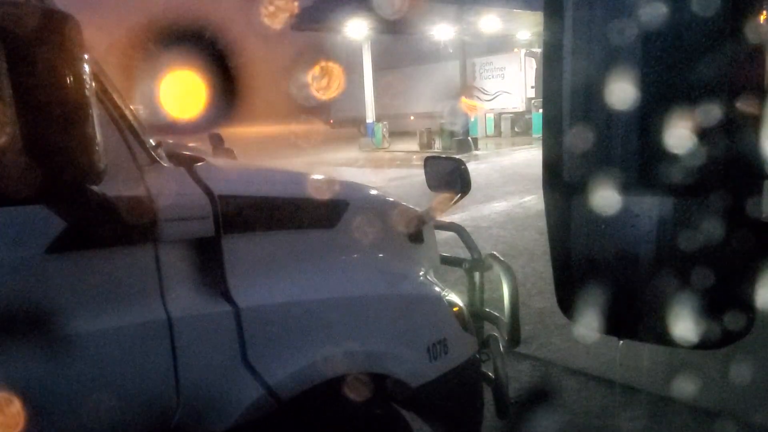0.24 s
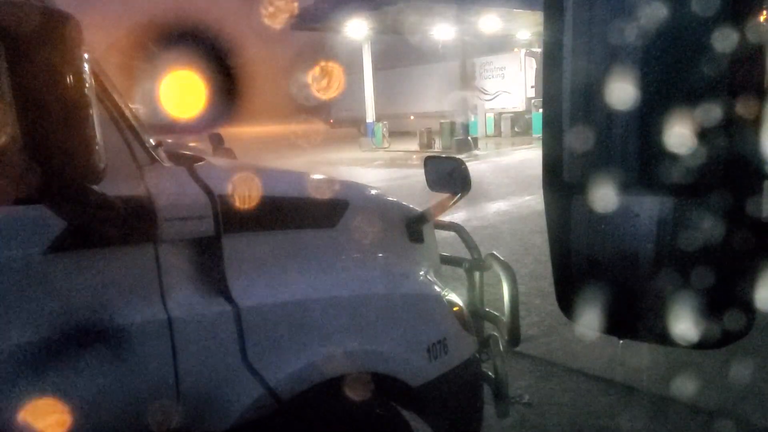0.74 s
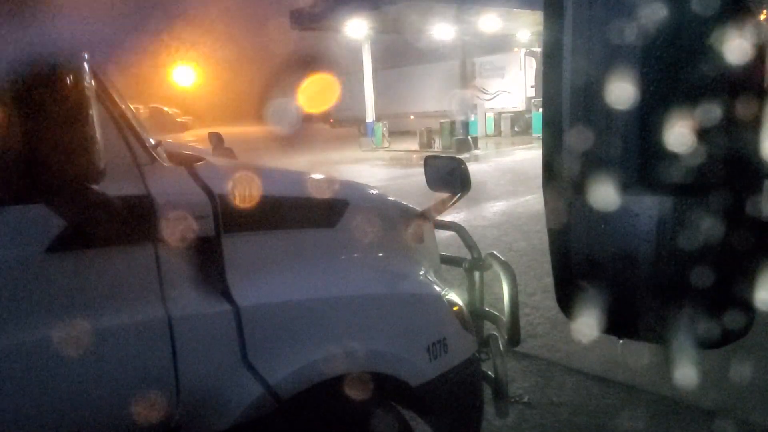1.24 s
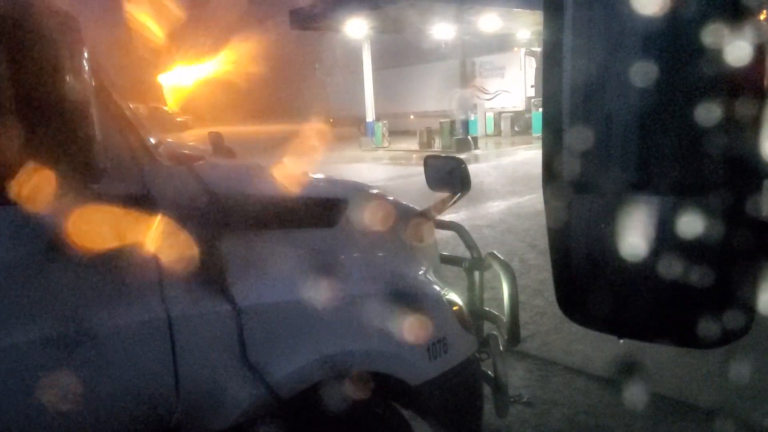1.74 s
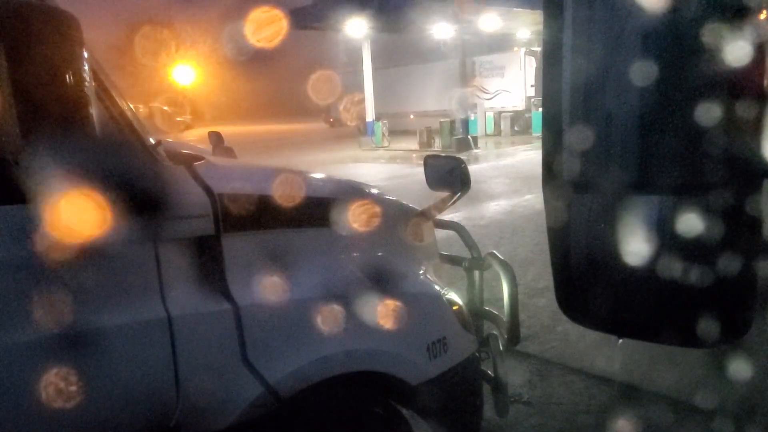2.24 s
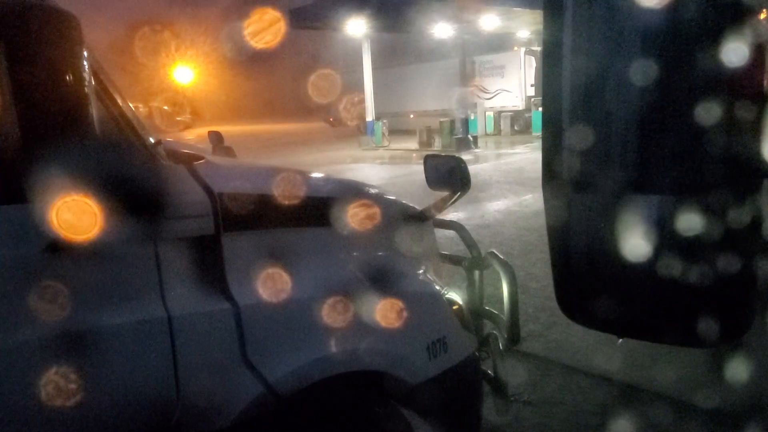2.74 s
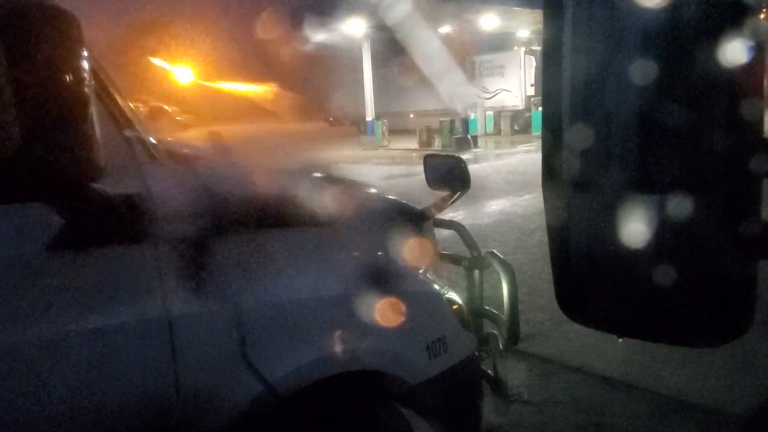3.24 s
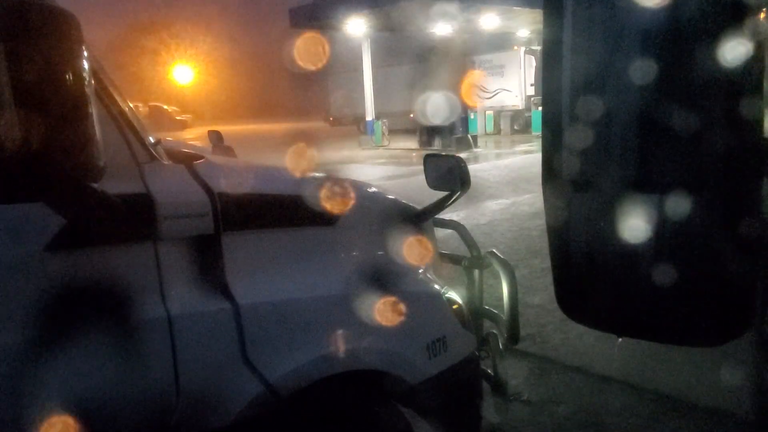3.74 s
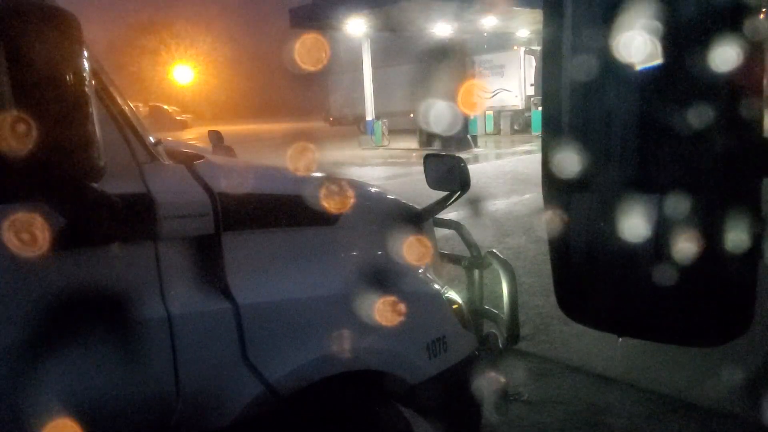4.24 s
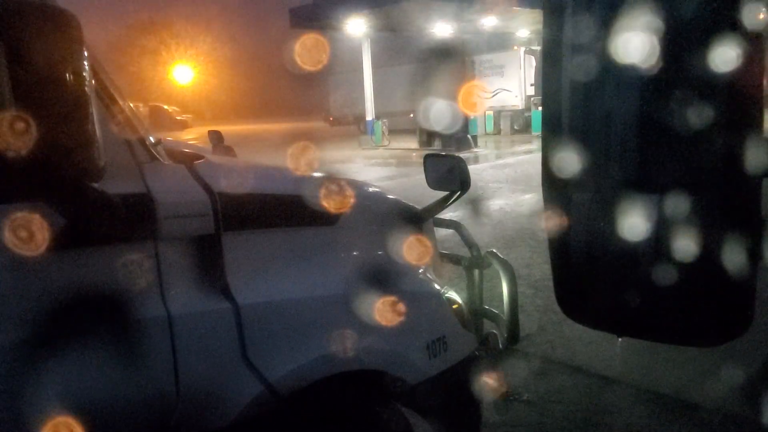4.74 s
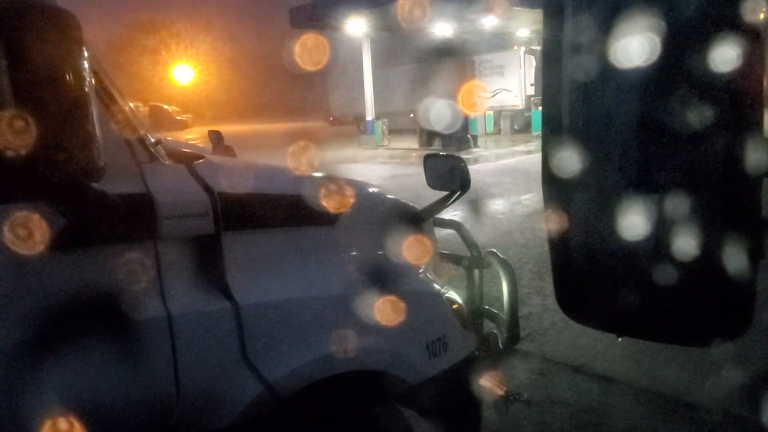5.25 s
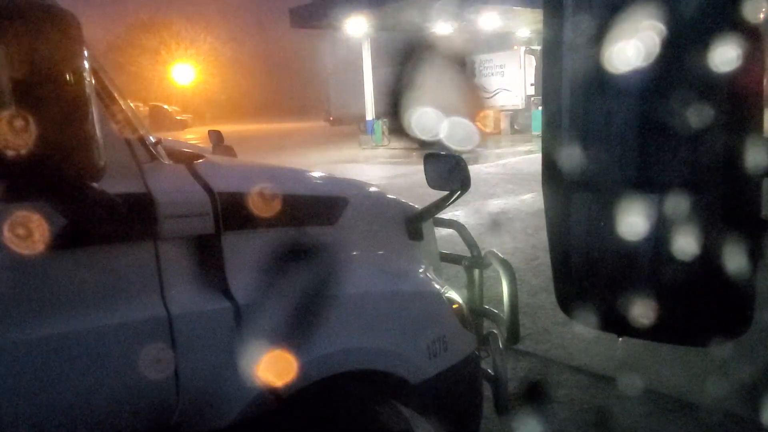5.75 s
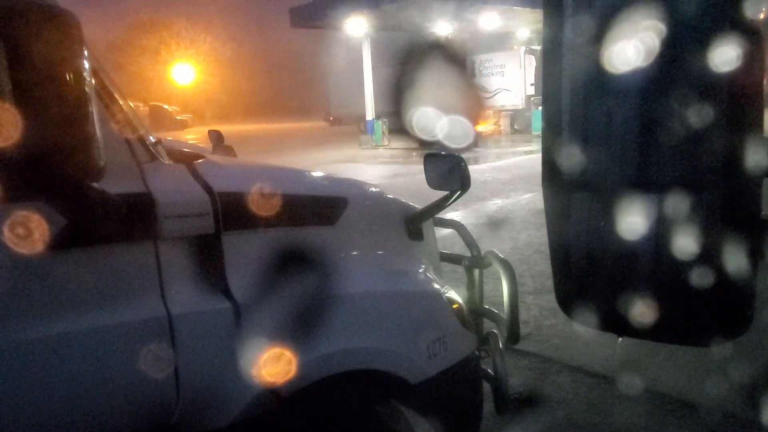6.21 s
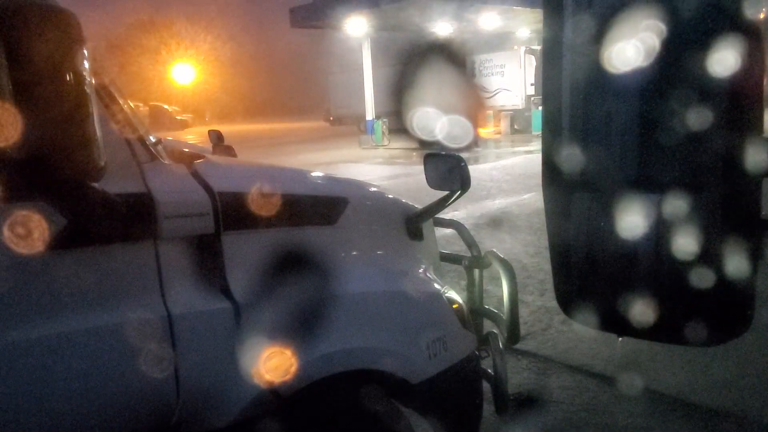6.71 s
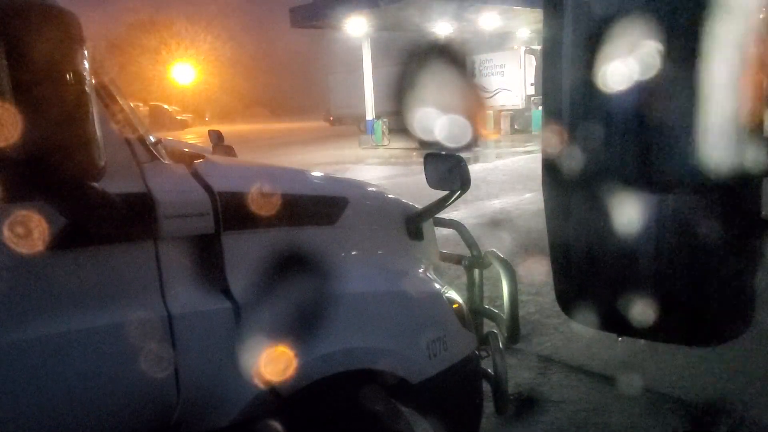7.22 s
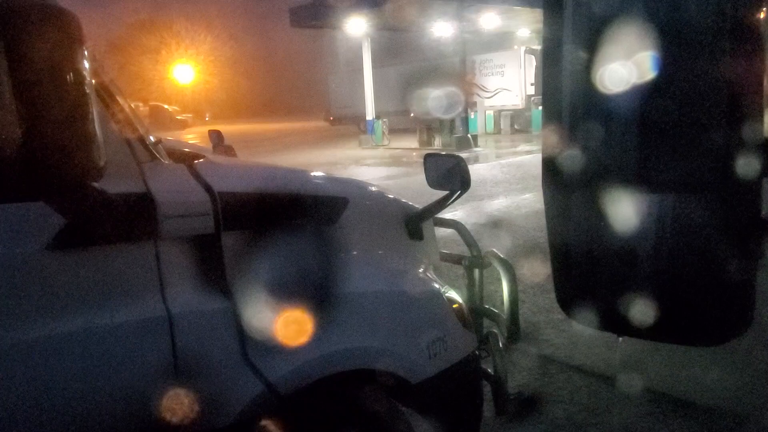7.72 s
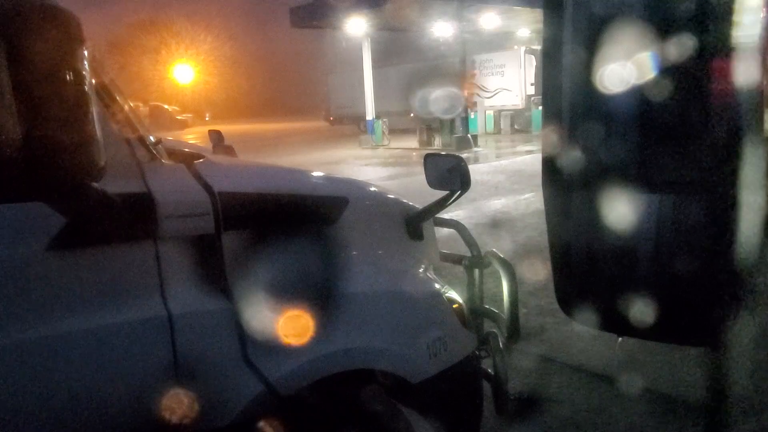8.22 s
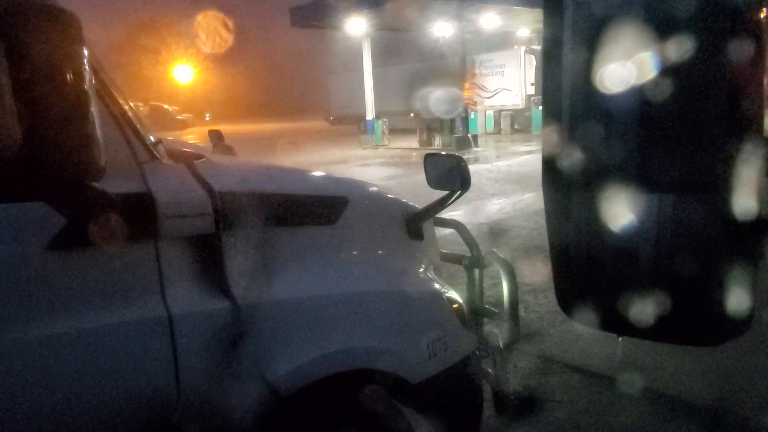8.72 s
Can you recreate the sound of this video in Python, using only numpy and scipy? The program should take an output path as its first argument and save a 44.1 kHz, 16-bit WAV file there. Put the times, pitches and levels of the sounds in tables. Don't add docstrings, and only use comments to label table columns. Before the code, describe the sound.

From inside a parked truck cab, low beating diesel idle, steady rain patter, sharp ringing drops on the pane and faint far thunder.

```python
import sys
import numpy as np
from scipy import signal
from scipy.fft import rfft, irfft, next_fast_len
from scipy.io import wavfile
from scipy.ndimage import map_coordinates

SR = 44100
rng = np.random.default_rng(int(sys.argv[2]) if len(sys.argv) > 2 else 0)


def persist_wave(psi):
    counts = np.round(np.clip(psi, -1, 1) * 32767).astype(np.int16)
    wavfile.write(sys.argv[1], SR, np.atleast_2d(counts).T)


def rack_gain(trim_db):
    fader = np.asarray(trim_db, float)
    return 10 ** (fader / 20)


N = 395577


def unit(x):
    return x / np.sqrt(np.mean(x ** 2) + 1e-20)


def along(points, hz):
    f, value = np.transpose(points)
    return np.interp(np.log(hz + 1), np.log(f + 1), value)


def curves(rows):
    s, *columns = np.transpose(rows)
    t = np.arange(N) / SR
    return [np.interp(t, s, column) for column in columns]


def wobble(rate):
    knots = rng.standard_normal(int(N * rate / SR) + 4)
    return map_coordinates(knots, [np.arange(N) * rate / SR])


def filtered(x, response):
    m = next_fast_len(N + 8192)
    return irfft(rfft(x, m) * response(np.fft.rfftfreq(m, 1 / SR)), m)[..., :N]


def coloured(x, spectrum):
    gain = rack_gain(along(spectrum, np.linspace(0, SR / 2, 20000)))
    rms_gain = np.sqrt(np.mean(gain ** 2))
    return filtered(x, lambda hz: rack_gain(along(spectrum, hz)) / rms_gain)


PORT_LAG, CAB_HZ = .00041, 890
# (frequency [Hz], shared power [0-1])
LIKENESS = [(200, 0.97), (350, .8), (500, 0.65), (800, 0.71), (950, .28), (1500, .35), (4000, 0.22),
            (6000, 0.066)]


def ports():
    def share(hz):
        return np.clip(along(LIKENESS, hz), 0, 1)

    def shared_path(hz):
        half_lag = np.pi * hz * PORT_LAG / (1 + (CAB_HZ / (hz + 1)) ** 20)
        return np.sqrt(share(hz)) * np.exp([1j * half_lag, -1j * half_lag])

    shared = filtered(rng.standard_normal(N), shared_path)
    own = filtered(rng.standard_normal((2, N)), lambda hz: np.sqrt(1 - share(hz)))
    return shared + own


def bursts(s, db, pan_db, t60):
    start = np.clip(np.round(s * SR).astype(int), 0, N - 1)
    power = [np.bincount(start, rack_gain(2 * db + side * pan_db), N) for side in (1, -1)]
    t = np.arange(SR // 5) / SR
    decay = rack_gain(-120 * t / t60) * (1 - np.exp(-t / 0.00043))
    return np.sqrt(np.abs(signal.fftconvolve(power, decay[None], axes=1)[:, :N]))


# (time [s], deep roll level [dB], upper roll level [dB])
THUNDER_ROLLS = [(0.0, -42, -32.5), (0.32, -40, -35.5), (0.42, -41, -34.5), (0.82, -38, -30.5),
                 (0.87, -39, -36), (1.1, -39, -32.5), (1.2, -40, -32.5), (1.3, -45, -27.5),
                 (1.45, -36.5, -34), (1.65, -36, -34), (1.75, -42, -36), (1.82, -39, -29), (1.97, -41, -35),
                 (2.07, -39, -27.5), (2.55, -36, -34.5), (2.62, -41, -26.5), (2.82, -41, -36),
                 (2.87, -39, -32), (3.85, -43, -31), (4.1, -38, -29.5), (4.22, -44, -29.5),
                 (4.35, -43, -23.5), (4.42, -46, -31), (5.04, -38, -34), (5.12, -36, -31), (5.2, -46, -34),
                 (5.27, -39, -32), (5.35, -39, -30), (5.64, -37, -31.5), (5.72, -42, -29), (5.9, -36, -35),
                 (6.02, -43, -32), (6.12, -46, -29.5), (6.39, -43, -28), (6.49, -42, -32), (6.62, -50, -31),
                 (6.8, -35, -31.5), (7.07, -37, -33), (7.19, -48, -31), (7.27, -42, -40),
                 (7.34, -52, -30.5), (7.87, -41, -34.5), (7.92, -54, -32), (8.02, -35, -36.5),
                 (8.59, -36.5, -31), (8.74, -37, -33), (8.87, -35, -36), (8.97, -33, -36)]
# (frequency [Hz], level [dB per Hz])
DEEP_ROLL = [(15, -60), (25, -8), (35, -1.5), (47, 7.5), (60, 4), (85, 1.5), (120, -42.5)]
# (frequency [Hz], level [dB per Hz])
UPPER_ROLL = [(60, -37), (90, -0.5), (140, 2), (200, -1.5), (260, -10), (400, -47)]


def thunder():
    deep_db, upper_db = curves(THUNDER_ROLLS)
    deep = rack_gain(deep_db + 1.5 + 1.5 * wobble(7)) * coloured(ports(), DEEP_ROLL)
    upper = rack_gain(upper_db - 1.0 + 1.2 * wobble(9)) * coloured(ports(), UPPER_ROLL)
    return deep + upper


def shower(spectrum, grainy, rate, spread_db, t60):
    when, size, side = rng.random((int(rate * N / SR), 3)).T
    grains = unit(bursts(when * N / SR, -spread_db * np.log(size), 8 * (side - .5), t60))
    share = np.clip(grainy, 0, 1)
    envelope = np.sqrt(1 - share + share * grains ** 2)
    return coloured(envelope * ports(), spectrum)


# (time [s], roof drumming level [dB], glass patter level [dB], fine spray level [dB])
RAIN_LEVELS = [(0.0, -36, -42.5, -56), (0.3, -37.5, -45.5, -57), (0.57, -39, -45, -57.5),
               (0.95, -36.5, -44, -56), (1.25, -38, -45, -58), (1.5, -37.5, -44, -56),
               (1.82, -36, -42.5, -55.5), (2.25, -35, -41.5, -55.5), (2.65, -34, -43, -55),
               (2.95, -36.5, -43, -56), (3.15, -35, -41.5, -55), (3.32, -34, -42.5, -54),
               (3.75, -36.5, -43.5, -56.5), (4.19, -35.5, -44, -58), (4.55, -38.5, -45, -58),
               (4.89, -37, -43.5, -54.5), (5.3, -36.5, -44.5, -59), (5.52, -37, -43.5, -55),
               (5.64, -35.5, -41, -53.5), (5.9, -37.5, -44.5, -58), (6.2, -36, -43.5, -54.5),
               (6.57, -37.5, -44.5, -57.5), (6.8, -35, -42.5, -57), (6.94, -35, -42.5, -57),
               (7.37, -38, -45, -57), (7.64, -38.5, -45.5, -61), (7.89, -39, -45.5, -59),
               (8.07, -38, -42.5, -56), (8.29, -39.5, -44, -55), (8.69, -36, -40.5, -52.5),
               (8.97, -38, -43, -55)]
# (frequency [Hz], level [dB])
ROOF_DRUMMING = [(120, -41), (220, -3), (300, -4), (450, -4.5), (650, -5.5), (740, -10.5), (830, -7),
                 (1000, -13.5), (1500, -49.5)]
# (frequency [Hz], level [dB])
GLASS_PATTER = [(600, -46), (1000, 2), (1400, 0.5), (2000, -2), (2700, -6.5), (3300, -10.5), (4400, -16),
                (5000, -24), (7000, -45)]
# (frequency [Hz], level [dB])
FINE_SPRAY = [(3500, -32), (5000, 6), (5800, 18), (6600, 11), (8000, 17), (9000, -23), (10500, -27),
              (12000, -7), (14000, -24), (15700, -17)]


def rain():
    roof_db, glass_db, spray_db = curves(RAIN_LEVELS)
    flurry = 0.88 * wobble(9) + 0.58 * wobble(25)
    roof = shower(ROOF_DRUMMING, grainy=0.29, rate=150, spread_db=2.5, t60=0.059)
    glass = shower(GLASS_PATTER, grainy=0.33, rate=200, spread_db=2, t60=0.04)
    spray = shower(FINE_SPRAY, grainy=0.38, rate=160, spread_db=2.5, t60=0.03)
    roof = rack_gain(roof_db + 0.42 * flurry + 1.5) * roof
    glass = rack_gain(glass_db + 0.72 * flurry + 3.0) * glass
    spray = rack_gain(spray_db + 1.3 * flurry - 3.5) * spray
    return roof + glass + spray


# (time [s], splash peak [dB], knock level [dB], top fizz level [dB], left-right difference [dB])
BIG_DROPS = [(0.0373, -44, -44, -56, 0.5), (0.0992, -42, -40, -61, 1.0), (1.074, -44, -31, -60, 3),
             (1.1149, -45, -31, -56, 4), (1.2645, -43, -43, -55, 1.5), (1.3289, -42, -42, -56, 1.5),
             (1.3748, -41, -43, -53, 0.0), (1.7489, -43, -37, -57, 0.5), (1.7823, -44, -37, -59, 1),
             (1.8083, -40, -33, -56, 2), (2.1061, -39, -36, -58, 2), (2.1824, -35, -33, -50, 0.0),
             (2.3615, -45, -44, -53, 0.5), (2.4109, -42, -35, -59, 1.0), (2.4548, -31.5, -28, -44, 2),
             (2.5301, -37, -37, -54, 4), (2.6918, -39, -35, -52, 1.0), (3.1777, -36, -38, -59, 0.5),
             (3.3169, -42, -33, -59, 2.5), (3.5264, -36.5, -32, -58, 1.5), (3.5738, -40, -45, -55, 1.0),
             (3.6955, -47, -39, -62, 1.5), (3.9799, -41, -39, -59, 1.0), (4.0415, -33, -33, -47, 2),
             (4.2926, -39, -40, -55, 1.0), (4.5635, -44, -42, -59, 0.0), (4.7152, -44, -40, -59, 2.0),
             (4.7995, -36, -31, -53, 0), (4.8349, -40, -40, -56, 0.5), (4.8723, -41, -40, -52, 0.5),
             (4.9097, -37, -32, -46, 2), (4.9886, -38, -37, -52, 1.5), (5.0888, -43, -39, -57, 1.0),
             (5.1831, -42, -46, -58, 0.0), (5.2809, -39, -40, -55, 2), (5.3597, -41, -43, -58, 0.5),
             (5.4545, -30, -30, -53, 4), (5.6575, -41, -41, -59, -1), (5.7014, -42, -38, -56, 1.5),
             (5.9189, -43, -44, -42, 2.0), (5.9559, -46, -41, -62, 2.0), (6.1569, -42, -37, -59, 2.5),
             (6.4278, -41, -41, -57, 2), (6.5041, -44, -39, -59, 0.5), (6.8418, -41, -35, -58, 1.5),
             (7.0259, -44, -40, -55, 3.0), (7.1422, -43, -36, -60, 1.5), (7.2419, -39, -37, -56, 1.0),
             (7.5198, -46, -45, -59, 1.5), (7.8146, -40, -35, -51, 3.5), (7.8665, -45, -44, -59, 2.0),
             (8.0202, -46, -43, -59, 0.5), (8.1429, -38, -32, -56, 2.5), (8.3539, -42, -36, -57, 3),
             (8.4357, -42, -39, -58, 3.5), (8.5644, -40, -26, -57, 2.0), (8.7555, -46, -34, -58, 1.5),
             (8.8174, -32, -36, -37, 1.0), (8.8937, -42, -34, -55, 3.0), (8.954, -39, -32, -51, 1.5)]
# (frequency [Hz], level [dB per Hz])
DROP_KNOCK = [(300, -33), (700, 1), (1500, 3), (2800, 0), (4500, -33)]
# (frequency [Hz], level [dB per Hz])
DROP_SPLASH = [(2000, -18), (3800, 6), (6000, -6), (8500, -6), (11000, -25)]
# (frequency [Hz], level [dB per Hz])
DROP_FIZZ = [(7500, -25), (10000, -4), (12500, 3), (15700, -4)]


def drops():
    s, splash_db, knock_db, fizz_db, pan_db = np.transpose(BIG_DROPS)
    knock = coloured(bursts(s, knock_db - 1, pan_db, t60=0.051) * ports(), DROP_KNOCK)
    splash = coloured(bursts(s, splash_db - 2, pan_db, t60=0.046) * ports(), DROP_SPLASH)
    fizz = coloured(bursts(s, fizz_db - 1.5, pan_db, t60=0.052) * ports(), DROP_FIZZ)
    return knock + splash + fizz


# (time [s], peak level [dB], pitch [Hz], decay by 60 dB [s], left-right difference [dB])
RINGING_DROPS = [(0.6734, -26, 1270, 0.04, 13), (1.1144, -31, 1590, 0.04, 4.0),
                 (1.5479, -26, 1780, 0.04, 3.5), (2.4563, -28, 2580, 0.04, 4.5),
                 (2.5197, -27, 1050, 0.04, 6), (2.9118, -25, 1370, 0.04, 10),
                 (3.3189, -26, 2690, 0.04, 4.0), (3.5259, -30, 1150, 0.04, 3.0),
                 (3.7723, -25, 1270, 0.04, 12), (3.8721, -30, 1210, 0.04, 2),
                 (4.0407, -35, 2650, 0.04, 4.0), (4.798, -30, 1930, 0.04, 4.0),
                 (4.8713, -31, 1120, 0.04, 4.5), (4.9097, -32, 1320, 0.04, 4.0),
                 (5.3038, -31, 1290, 0.04, 9), (5.4545, -23, 1260, 0.04, 9), (5.7099, -27, 1320, 0.04, 12),
                 (5.7763, -31, 1000, 0.04, 4.0), (5.9868, -34, 1080, 0.04, 1), (6.1896, -21, 1630, 0.04, 6),
                 (6.3076, -33, 1950, 0.04, 4.0), (6.3874, -30, 1260, 0.04, 6),
                 (6.6358, -32, 1000, 0.04, 2.0), (6.8433, -29, 1270, 0.04, 8), (6.9012, -30, 1070, 0.04, 8),
                 (7.0938, -26, 1000, 0.04, 6), (7.7717, -25, 1180, 0.04, 9), (7.8156, -31, 1930, 0.04, 4.0),
                 (8.1227, -25, 1650, 0.04, 3.5), (8.1424, -25, 1820, 0.04, 5),
                 (8.314, -32, 1120, 0.04, 3.5), (8.3544, -33, 1150, 0.04, 1),
                 (8.5689, -23, 1920, 0.04, 2.5), (8.7735, -31, 1260, 0.04, 4),
                 (8.8179, -31, 1910, 0.04, 3.5), (8.8892, -26, 1180, 0.04, 3)]


def pings():
    out = np.zeros((2, N + SR))
    t = np.arange(SR // 8) / SR
    port_time = t - np.array([[0], [PORT_LAG]])
    for s, db, hz, t60, pan_db in RINGING_DROPS:
        envelope = rack_gain(db - 4 - 60 * t / t60) * (1 - np.exp(-t / .001))
        ring = envelope * np.sin(2 * np.pi * hz * port_time)
        start = round(s * SR)
        out[:, start:start + len(t)] += rack_gain([[pan_db / 2], [-pan_db / 2]]) * ring
    return out[:, :N]


# (multiple of firing rate, level [dB rms])
IDLING_ENGINES = [
    ((43.761, .0080, 4.22), [(1, -25.4), (2, -38.9), (3, -36.2), (4, -37.8), (5, -54)]),
    ((45.015, .0018, .39), [(1, -22.6), (2, -36.9), (3, -42.7), (4, -57)]),
    ((44.82, .0001, -.55), [(.5, -51), (1, -36), (1.5, -48.7), (2, -38.6)]),
    ((41.667, .0120, 4.43), [(1, -40.3), (2, -46.4), (3, -53)]),
    ((32.502, .0273, .81), [(1, -42.8), (1.5, -43.7), (2, -45.1), (3, -46.6), (6, -56)]),
    ((30.017, .0092, -.13), [(1, -49.6), (2, -51.3)]),
    ((38.498, 0, .19), [(1, -45.8)]),
    ((39.506, 0, 2.45), [(1, -50.8)]),
]


def engines():
    t, out = np.arange(N) / SR, np.zeros(N)
    for (hz, first, pipe_lag), orders in IDLING_ENGINES:
        turn = 2 * np.pi * hz * (t - first) + 0.056 * wobble(1.49) + 0.032 * wobble(8)
        for multiple, db in orders:
            level = np.sqrt(2) * rack_gain(db + 0.68 * wobble(4))
            out += level * np.cos(multiple * turn + pipe_lag)
    return out


# (frequency [Hz], left-right difference [dB])
LEFT_LEAN = [(60, 1), (99, 1), (160, 1.5), (270, -0.5), (450, 3), (740, 0.5), (1220, 5), (2010, 3),
             (3330, 2.5), (5500, 1.0), (9080, 0.5), (15000, 5.5)]


def scene():
    def lean(hz):
        half_db = along(LEFT_LEAN, hz) / 2
        return rack_gain([half_db, -half_db])

    steady = thunder() + rain() + engines()
    return filtered(steady, lean) + drops() + pings()


def top_cut(x):
    return signal.sosfilt(signal.butter(12, 15780, fs=SR, output="sos"), x)


def record(dry):
    return top_cut(dry)


dry = scene()
out = record(dry)
persist_wave(out)
```